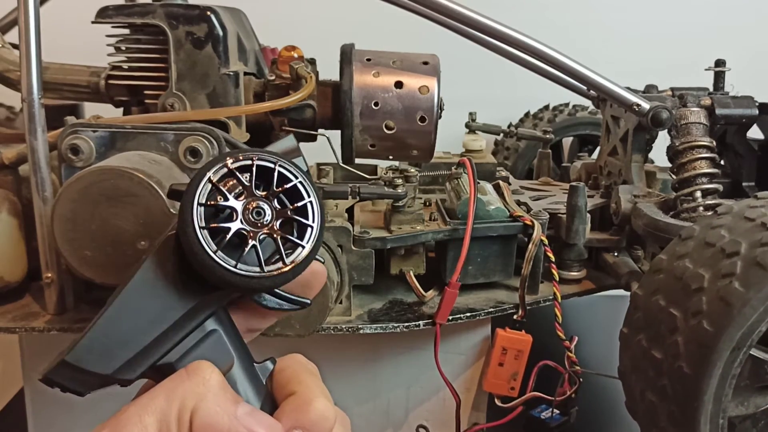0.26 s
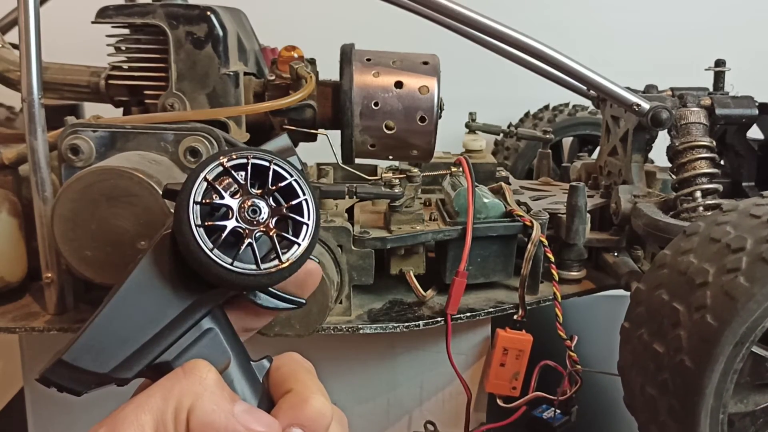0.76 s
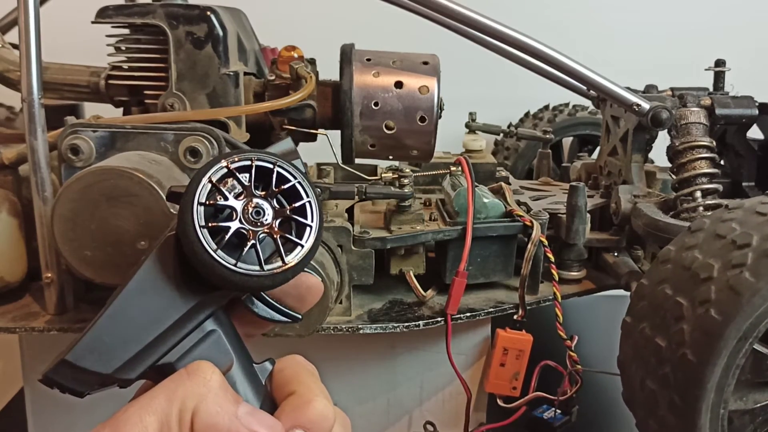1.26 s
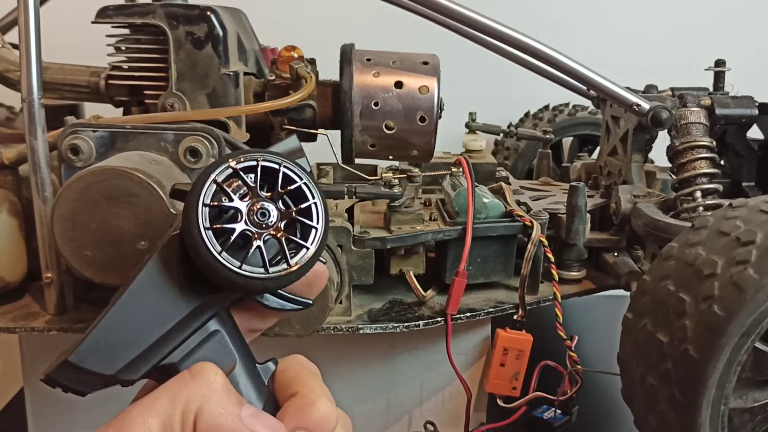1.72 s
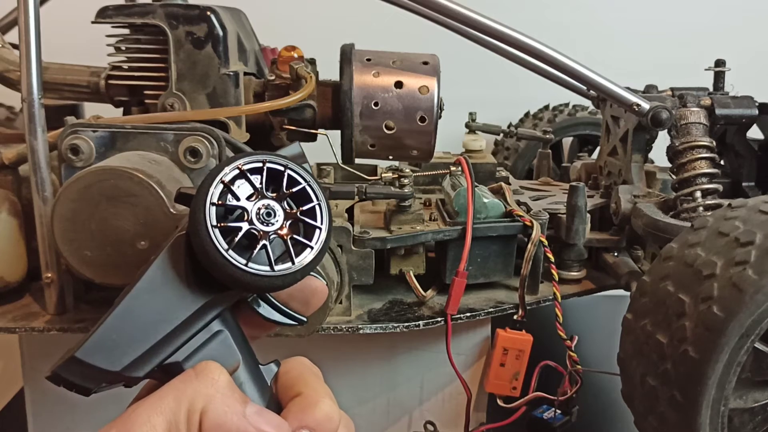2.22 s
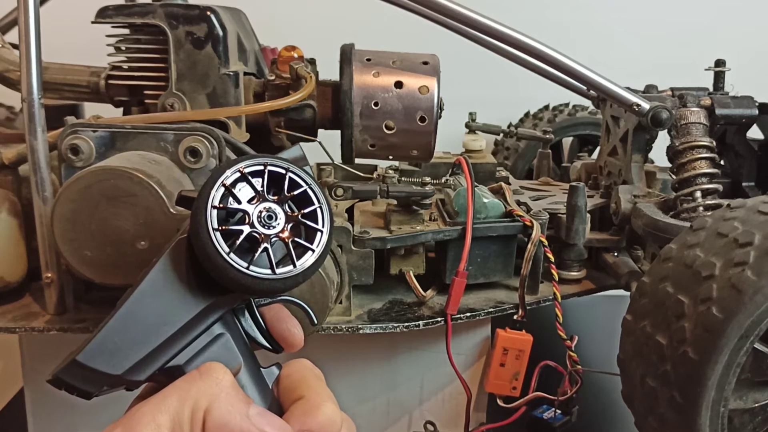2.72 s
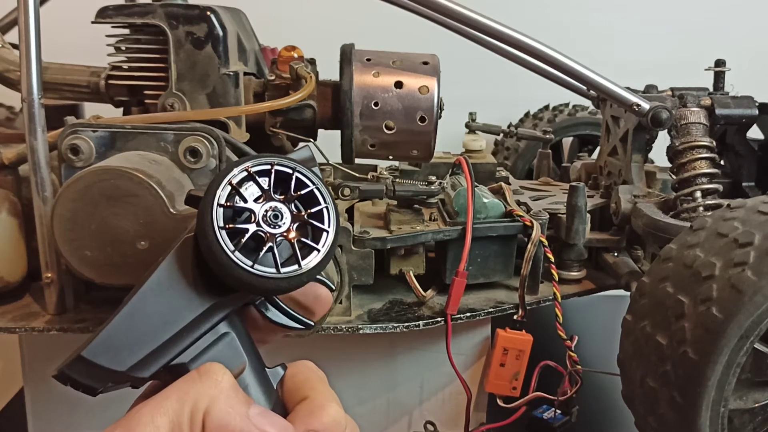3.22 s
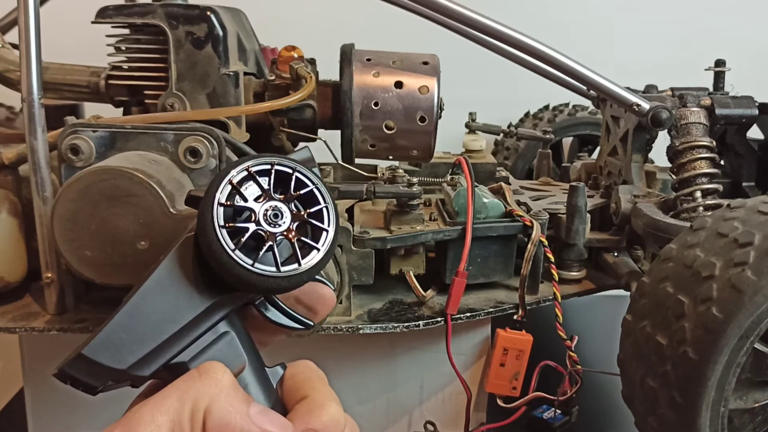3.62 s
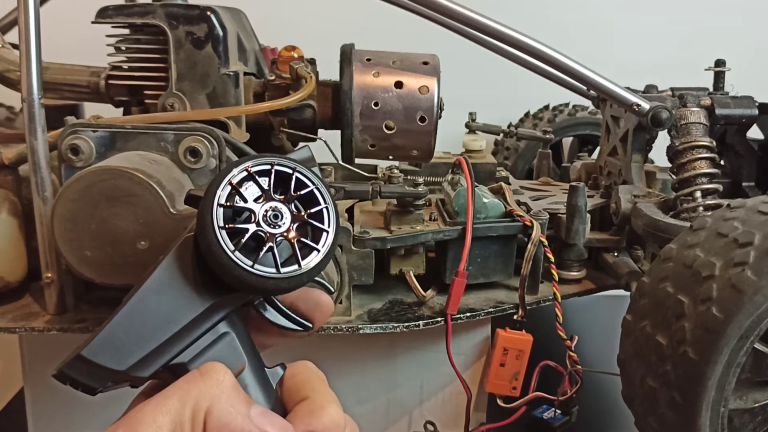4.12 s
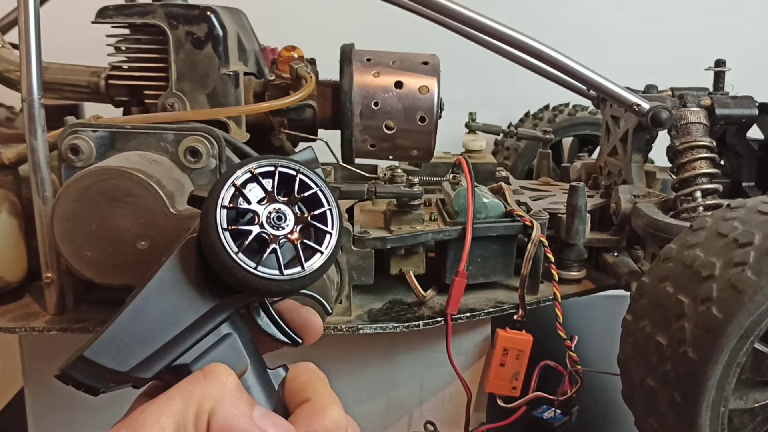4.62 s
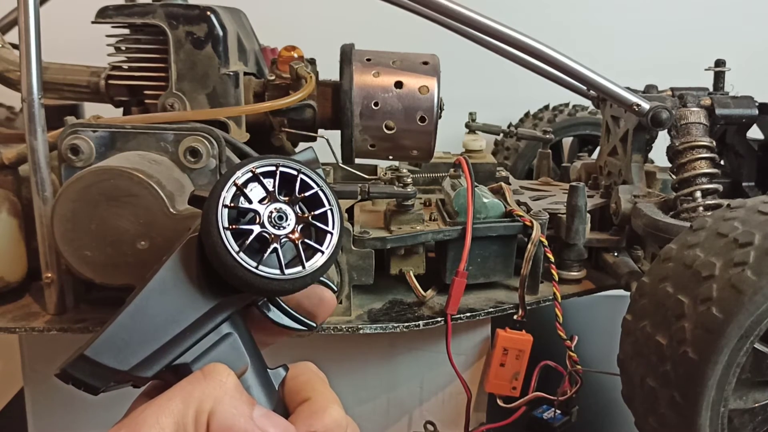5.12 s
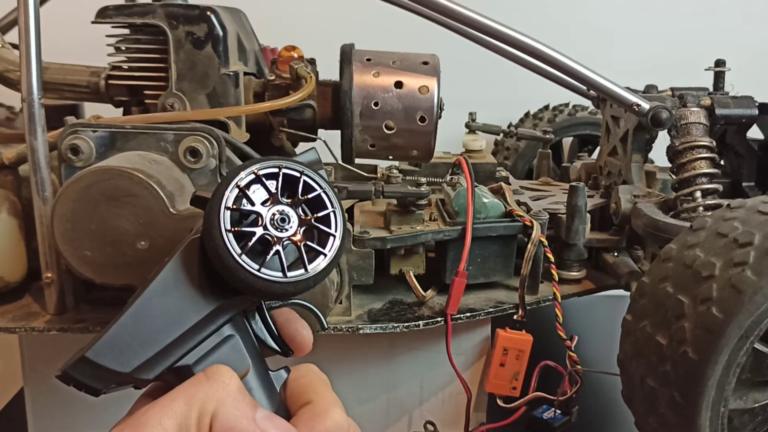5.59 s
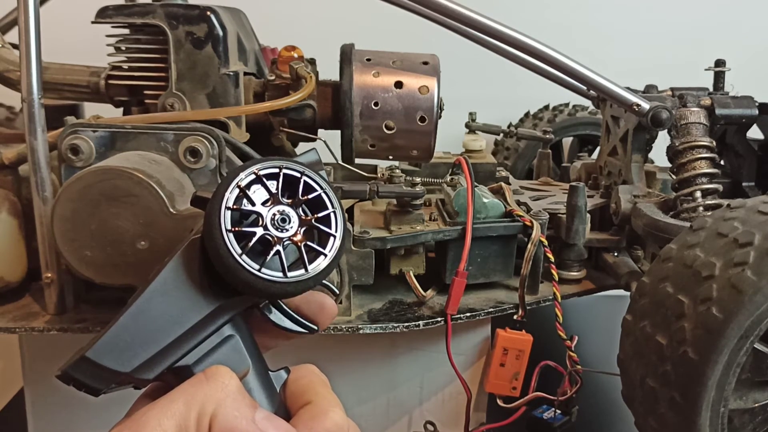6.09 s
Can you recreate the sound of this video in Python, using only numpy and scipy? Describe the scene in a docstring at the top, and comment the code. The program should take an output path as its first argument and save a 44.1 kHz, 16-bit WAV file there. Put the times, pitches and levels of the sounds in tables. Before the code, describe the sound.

A model car's small steering servo works on a bench in a small room, miked close in stereo. Faint short whirs come first, then longer high whines near two kilohertz, grainy with gear rattle and little chirps. The bursts turn quick and choppy, weaken briefly, then lengthen again and end in small whirs. Hard plastic ticks, linkage knocks and soft chassis bumps are scattered over a very quiet low rumble.

```python
"""A steering servo swings a model car's front wheels on a workbench in a small room, over a quiet rumble.
It starts with brief whirs; from about 1 s longer whines near 2 kHz follow, rattling and chirping as the load lets go.
From about 4 s to 5 s the whirs come short and quick, then weaken; longer whines return and small whirs end it.
Plastic ticks, linkage knocks and soft chassis bumps are scattered throughout.
Pinion tones and tooth clicks make the servo, filtered noise the rumble and ticks, ringing modes the blows."""
import sys
import numpy as np
from scipy import signal
from scipy.fft import rfft, irfft
from scipy.io import wavfile
from scipy.ndimage import uniform_filter1d, map_coordinates

SR = 44100
rng = np.random.default_rng(int(sys.argv[2]) if len(sys.argv) > 2 else 0)


def transcribe(signal):
    """Save signal, clipped to [-1, 1], as a 16-bit WAV file at the path in sys.argv[1]."""
    frames = np.atleast_2d(signal).T
    limited = np.clip(frames, -1, 1)
    pcm = np.round(limited * 32767).astype(np.int16)
    wavfile.write(sys.argv[1], SR, pcm)


N = 280035
T = np.arange(N) / SR


def undb(db):
    """Decibels to gain."""
    return 10 ** (np.asarray(db) / 20)


def unit(x):
    """Scale to rms 1."""
    return x / np.sqrt(np.mean(x ** 2) + 1e-20)


def walk(rate_hz):
    """Smooth random drift with rms 1, about `rate_hz` new values a second."""
    width = max(int(SR / rate_hz), 2)
    smoothed = uniform_filter1d(rng.standard_normal(N), width)
    return unit(uniform_filter1d(smoothed, width))


def colour(x, points):
    """Causal minimum-phase filter through (freq_hz, gain_db) points."""
    freq_hz, gain_db = np.transpose(sorted(points))
    size = 8192
    grid_hz = np.arange(size // 2 + 1) * SR / size + 1
    log_gain = np.log(undb(np.interp(np.log(grid_hz), np.log(freq_hz), gain_db)))
    # folding the cepstrum onto positive time puts the energy as early as possible
    cepstrum = irfft(log_gain)[:size // 2]
    cepstrum[1:] *= 2
    response = irfft(np.exp(rfft(cepstrum, size)))
    return signal.fftconvolve(x, response)[:len(x)]


def add(track, start_s, sound):
    """Mix a sound into the track at its start time."""
    i = max(int(start_s * SR), 0)
    track[i:i + len(sound)] += sound[:N - i]


# spectrum of the room rumble and hiss, before its overall level: freq_hz, density_db (dB per Hz, relative)
RUMBLE_SPECTRUM = [(20, -25), (42, -42), (70, -8.5), (105, -3), (170, -5.5), (270, -4), (500, -13.5),
                   (800, -16), (1200, -20), (2200, -22), (3000, -24.5), (4400, -24.5), (5200, -35),
                   (6400, -29.5), (8000, -34), (16000, -30)]


def room_rumble(level_db=-62.5, side_db=-2):
    """Steady noise, mostly low with faint hiss, partly alike on both sides."""
    mid = unit(colour(rng.standard_normal(N), RUMBLE_SPECTRUM))
    side = unit(colour(rng.standard_normal(N), RUMBLE_SPECTRUM))
    return undb(level_db) * (mid + undb(side_db) * side * np.array([[1], [-1]]))


def blows(events, modes, contact_s, gain_db):
    """Short, rough contacts ring the modes of a part, each mode slightly detuned per blow."""
    out, t = np.zeros(N), T[:SR // 4]
    # the contact pushes mostly within the range of the modes
    band_hz = [modes[0][0] * .95, modes[-1][0] * 1.3]
    band = signal.butter(3, band_hz, "bandpass", fs=SR, output="sos")
    for start_s, level_db in events:
        ring = np.zeros(len(t))
        for freq_hz, mode_db, t60_s in modes:
            detune = 1 + 0.02 * rng.standard_normal()
            ring += undb(mode_db - 60 * t / t60_s) * np.sin(2 * np.pi * freq_hz * detune * t)
        push = signal.sosfilt(band, rng.standard_normal(len(t)) * np.exp(-t / contact_s))
        hit = signal.fftconvolve(ring, push)[:len(t)]
        add(out, start_s, hit / np.abs(hit).max() * undb(level_db + gain_db))
    return out


# the tyres shift and bump the chassis: start_s, level_db (peak before the common gain)
BUMPS = [(0.464, -54.5), (0.485, -46.5), (0.596, -63.5), (2.643, -55.5), (2.664, -66), (4.169, -59),
         (4.577, -67), (5.585, -59), (5.61, -58)]
# modes of the chassis: freq_hz (before detuning), level_db (relative), t60_s
CHASSIS_MODES = [(288, -6, 0.11), (316.6, -7, 0.18), (355, -3, 0.077), (390, -5, 0.066), (526, -10, 0.065),
                 (680, -10.5, 0.044)]


def chassis_bumps():
    """Soft contacts ring the low modes of the chassis."""
    return blows(BUMPS, CHASSIS_MODES, contact_s=0.0031, gain_db=9.5)


# play in the steering linkage is taken up: start_s, level_db (peak before the common gain)
KNOCKS = [(0.114, -58.5), (0.477, -58.5), (0.596, -74.5), (0.821, -62), (1.792, -63), (2.417, -55),
          (2.65, -58), (4.17, -71.5), (3.228, -60), (4.577, -69), (5.003, -59.5), (5.843, -65)]
# modes of the linkage: freq_hz (before detuning), level_db (relative), t60_s
LINKAGE_MODES = [(386, -10, 0.021), (477, -4.5, 0.056), (583, -9, 0.016), (760, -8, 0.027), (847, 5, 0.024),
                 (998, -3, 0.02), (1269, 5, 0.045), (1434, -3.5, 0.061)]


def linkage_knocks():
    """Loose joints knock and ring the short modes of the linkage."""
    return blows(KNOCKS, LINKAGE_MODES, contact_s=0.0027, gain_db=17.0)


# sharp plastic ticks: start_s, level_db (peak before the common gain), top_db (added to the top colour point)
TICKS = [(0.113, -38.5, -25), (0.25, -28, -17.5), (0.603, -37, -37), (1.483, -40.5, -81),
         (2.3008, -36.5, -14.5), (2.3156, -21.5, -12), (2.3353, -23.5, -35.5), (2.4151, -22, -47),
         (3.3873, -16, -6.5), (3.791, -28.5, -41), (4.259, -27, -19.5), (4.7333, -27.5, -29.5),
         (4.887, -56.5, -30), (5.257, -29.5, -14), (5.267, -30.5, -42), (5.3365, -28.5, -38),
         (5.897, -16.5, -12.5), (6.222, -37, -20)]
# shared colour of the ticks: freq_hz, gain_db
TICK_COLOUR = [(500, -38), (1200, -20.5), (2000, 1.5), (3000, 7.5), (5000, -8.5), (6400, 13.5), (8000, 2.5),
               (15000, 2)]


def plastic_ticks(t60_s=0.016, gain_db=-4.5):
    """Hard plastic edges snap past each other: decaying noise, each tick with its own brightness."""
    out, t = np.zeros(N), T[:4096]
    for start_s, level_db, top_db in TICKS:
        crack = rng.standard_normal(len(t)) * undb(-60 * t / t60_s)
        points = [(hz, db + top_db * (hz > SR / 4)) for hz, db in TICK_COLOUR]
        crack = colour(crack, points)
        add(out, start_s, crack / np.abs(crack).max() * undb(level_db + gain_db))
    return out


START_HZ = 1601.4  # mesh rate at which the motor catches
BRAKE_POWER = 3.0  # holds its speed and brakes late: power of the share of the way gone
RUN_DOWN_HZ_PER_S = 16000  # loss of mesh rate between stretches of drive
ATTACK_S, COAST_S = 0.0032, 0.007  # drive switches on (ramp), coasts out (time constant)
WHINE_SLOPE_DB, RATTLE_SLOPE_DB = 2, 0.62  # fall per 100 Hz below top speed
JOLT_WHINE_DB, JOLT_S = 5, 0.0085  # extra whine of the starting torque and its fade (time constant)

# one stretch of motor drive per row; a longer swing may span several rows:
# start_s, length_s, spin_up_s (time constant), top_hz (target mesh rate),
# end_hz (mesh rate aimed at by the end of the stretch), whine_db and rattle_db (base levels at top speed),
# second_db (second overtone term, relative to the whine)
DRIVE_STRETCHES = [ (0.0, 0.08, 0.0032, 1733, 1612, -54, -50.5, -15.5),
                   (0.108, 0.12, .002, 1974, 1825, -45, -44, -12),
                   (0.245, 0.014, 0.00098, 2067, 1903, -42, -46, -18),
                   (0.346, 0.017, 0.0029, 1928, 1873, -40.5, -49, -17),
                   (0.372, 0.045, 0.002, 1950, 1884, -41, -48, -18),
                   (0.446, 0.063, 0.009, 1890, 1874, -46.5, -46.5, -11.5),
                   (0.73, 0.0078, 0.0015, 1675, 1684, -46, -52.5, -7.5),
                   (0.737, 0.0087, 0.001, 2317, 2233, -35, -44, -25.5),
                   (0.748, 0.007, 0.0008, 1683, 1648, -49, -49, -14.5),
                   (0.811, 0.019, 0.0027, 1670, 1631, -51.5, -51, -19.5),
                   (0.984, 0.0098, 0.00089, 2350, 2278, -36, -44, -17.5),
                   (0.993, 0.23, 0.0031, 2149, 2059, -34.5, -50.5, -29),
                   (1.223, 0.011, 0.00092, 1850, 1754, -46, -52, -20),
                   (1.501, 0.02, 0.0039, 1763, 1763, -52, -57, -11.5),
                   (1.523, 0.2, 0.0083, 1900, 1798, -43.5, -50, -12),
                   (1.717, 0.039, .004, 1771, 1654, -53.5, -49, -15),
                   (1.905, 0.014, 0.0012, 1668, 1670, -52, -60, -23),
                   (1.921, 0.158, 0.0011, 2161, 2100, -34.5, -49, -28),
                   (2.081, 0.045, 0.0037, 1979, 1697, -40, -50, -22),
                   (2.328, 0.053, .02, 2143, 2117, -42, -50, -15.5),
                   (2.388, 0.15, 0.0041, 2162, 2130, -33.5, -49.5, -23),
                   (2.531, 0.043, 0.0035, 2104, 2004, -40, -50, -18.5),
                   (2.567, 0.35, .004, 1995, 1919, -41, -51, -14),
                   (3.203, 0.031, 0.0032, 1936, 1947, -43.5, -48, -24),
                   (3.229, 0.3, 0.015, 2037, 1984, -38.5, -47.5, -21.5),
                   (3.507, 0.19, 0.0037, 1938, 1896, -39.5, -47.5, -16),
                   (3.714, 0.069, 0.0051, 1790, 1623, -49.5, -53.5, -20.5),
                   (3.802, 0.11, .0015, 2171, 2071, -33.5, -48.5, -37),
                   (3.939, 0.01, 0.00094, 1707, 1643, -48.5, -53, -20.5),
                   (3.964, 0.059, 0.0076, 1940, 1823, -40.5, -46.5, -16.5),
                   (4.043, 0.09, 0.0044, 2080, 1970, -37.5, -48, -21),
                   (4.157, 0.075, 0.0094, 1987, 1881, -39.5, -43.5, -31),
                   (4.25, 0.0077, .002, 1684, 1666, -49, -52, -24.5),
                   (4.286, .018, 0.0065, 1845, 1724, -46.5, -51, -20.5),
                   (4.323, 0.08, 0.0063, 2001, 1875, -41, -44.5, -23),
                   (4.416, 0.0078, 0.0026, 1814, 1706, -45.5, -52, -16.5),
                   (4.443, 0.085, .006, 2056, 1979, -38, -48, -22),
                   (4.522, 0.0088, 0.00097, 1732, 1659, -48, -51, -18.5),
                   (4.542, 0.055, 0.005, 1989, 1887, -39, -47, -17.5),
                   (4.612, 0.0088, 0.0018, 1677, 1660, -45.5, -53, -21.5),
                   (4.63, 0.087, 0.0081, 2107, 1974, -37.5, -49, -26.5),
                   (4.746, 0.097, 0.0084, 1964, 1890, -41, -43.5, -30),
                   (4.862, 0.04, 0.0027, 1796, 1641, -47.5, -51, -18),
                   (4.918, 0.04, 0.0034, 2196, 2090, -34, -45.5, -24),
                   (4.973, 0.084, 0.0039, 1977, 1876, -42, -44, -28.5),
                   (5.077, 0.075, 0.0043, 1804, 1582, -49, -53, -19.5),
                   (5.178, 0.024, 0.0031, 1494, 1450, -58, -59, -20),
                   (5.239, 0.013, .003, 1446, 1460, -59.5, -56, -3),
                   (5.341, 0.014, .006, 1754, 1753, -48, -53, -20.5),
                   (5.355, 0.197, 0.0081, 2166, 2060, -34.5, -48, -20),
                   (5.565, .245, 0.0038, 1978, 1892, -41.5, -51, -13.5),
                   (5.828, 0.019, 0.0038, 1836, 1791, -48.5, -54.5, -21),
                   (5.845, 0.23, 0.0031, 2021, 1919, -39.5, -47.5, -22.5),
                   (6.104, 0.025, 0.0052, 1949, 1845, -41.5, -45.5, -40),
                   (6.144, 0.01, 0.0031, 1755, 1671, -50.5, -53, -18),
                   (6.177, 0.0084, 0.0039, 1732, 1660, -50.5, -53, -6.5),
                   (6.199, 0.039, 0.0032, 1737, 1571, -47.5, -51.5, -22),
                   (6.247, 0.018, 0.0017, 1773, 1698, -43, -63, -23.5), ]


def motor_drive():
    """Each stretch moves the mesh rate to its top, eases it to its end and lets it run down; gains follow."""
    mesh_hz = np.full(N, START_HZ)
    whine, rattle, second = np.zeros(N), np.zeros(N), np.zeros(N)
    for start_s, length_s, spin_up_s, top_hz, end_hz, whine_db, rattle_db, second_db in DRIVE_STRETCHES:
        i = max(int(start_s * SR), 0)
        now = slice(i, i + SR)  # each stretch takes over from the one before
        age_s = T[now] - T[i]
        over_s = np.maximum(age_s - length_s, 0)
        spin_up_hz = (top_hz - mesh_hz[i]) * np.exp(-age_s / spin_up_s)
        brake_hz = (top_hz - end_hz) * np.minimum(age_s / length_s, 1) ** BRAKE_POWER
        below_hz = spin_up_hz + brake_hz
        below = below_hz / 100
        on = np.minimum(age_s / ATTACK_S, 1)
        running = on * np.exp(-over_s / COAST_S)
        jolt_db = JOLT_WHINE_DB * np.exp(-age_s / JOLT_S)
        new_whine = running * undb(whine_db - WHINE_SLOPE_DB * below + jolt_db)
        new_rattle = running * undb(rattle_db - RATTLE_SLOPE_DB * below)
        mesh_hz[now] = np.maximum(top_hz - below_hz - RUN_DOWN_HZ_PER_S * over_s, min(START_HZ, end_hz))
        whine[now] = (1 - on) * whine[now] + new_whine
        rattle[now] = (1 - on) * rattle[now] + new_rattle
        second[now] = undb(second_db)
    return mesh_hz, whine, rattle, second


# the load lets go: centre_s, race_hz (mesh rate reached), whine_db (base level)
SLIPS = [(0.131, 2002, -36), (0.251, 2030, -37), (1.098, 2170, -31), (1.618, 2256, -38.5),
         (1.66, 2310, -35), (1.725, 2280, -37.5), (1.75, 2150, -41.5), (2.586, 2171, -38.5),
         (2.605, 2271, -30), (2.678, 2267, -33.5), (2.698, 2155, -34), (2.718, 2233, -31),
         (2.758, 2147, -34), (2.812, 2143, -36), (2.855, 2156, -34), (2.896, 2143, -34.5),
         (3.333, 2282, -33.5), (3.366, 2264, -30), (3.395, 2189, -32.5), (3.515, 2353, -29.5),
         (3.827, 2184, -25), (3.912, 2172, -31), (4.068, 2155, -32.5), (4.672, 2243, -34.5),
         (4.712, 2152, -34), (4.97, 2122, -38), (5.378, 2263, -28), (5.583, 2171, -33), (5.644, 2254, -34),
         (5.666, 2286, -31.5), (5.688, 2219, -34), (5.735, 2239, -36.5), (5.755, 2190, -37),
         (5.992, 2089, -33), (6.119, 1950, -37.5), (6.251, 1880, -48)]


def slips(mesh_hz, whine, rattle, second, half_s=.0035, second_db=-20.5, clash_db=-12):
    """The unloaded motor chirps as it races through the gear slack; teeth clash as the slack closes."""
    for centre_s, race_hz, whine_db in SLIPS:
        now = slice(int(centre_s * SR) - SR // 20, int(centre_s * SR) + SR // 20)
        free = np.exp(-((T[now] - centre_s) / half_s) ** 2)
        mesh_hz[now] += (race_hz - mesh_hz[now]) * np.minimum(2 * free, 1)
        whine[now] += (undb(whine_db) - whine[now]) * free
        rattle[now] += undb(whine_db + clash_db) * free
        second[now] += (undb(second_db) - second[now]) * free
    return mesh_hz, whine, rattle, second


SMOOTH_HZ = 2050  # mesh rate above which the drive no longer pulses
SURGE, PULSING = .58, 4.0  # swing of speed and of force per unit of slack
WANDER, JITTER = .013, .006  # slow and fast unevenness, shares of speed (wander grows with slack)
JOSTLE = .16  # speed share when rattle is all there is


def motor_turning(mesh_hz, whine, rattle, pulse_hz=42):
    """Uneven running of the motor: teeth passed so far, and the force of the pulsing drive."""
    slack = np.clip(1 - mesh_hz / SMOOTH_HZ, 0, .2)
    # at low speed each command pulse kicks the motor: it is loudest while it speeds up
    pulse = 2 * np.pi * np.cumsum(pulse_hz * (1 + .2 * walk(25))) / SR
    surge = SURGE * slack * signal.sawtooth(pulse, .7)
    drive = 1 + PULSING * slack * np.sin(pulse - np.pi / 5)
    # rattling teeth jostle the pinion and break up its tone
    rattle_share = rattle / (rattle + whine + 1e-12)
    jostle = JOSTLE * rattle_share ** 2 * walk(260)
    wander = WANDER * (1 + 3 * slack) * walk(170)
    speed_hz = mesh_hz * (1 + surge + wander + jostle + JITTER * walk(900))
    return np.cumsum(speed_hz) / SR, drive


# what the gear case radiates when teeth rattle: freq_hz (before drift), gain_db
CASE_COLOUR = [(150, -19.5), (750, -14), (1050, -22), (1400, -7.5), (1660, -2), (1780, -3), (1950, 6.5),
               (2180, 14), (2400, -5), (2580, -2.5), (2850, 6), (3150, 2.5), (3470, -7), (3760, 1),
               (4300, -4), (4680, 6.5), (4950, -13.5), (5400, -5.5), (5850, -5.5), (6150, 9), (6700, 0.5),
               (7000, -5.5), (7500, 5.5), (7900, -9), (8350, -3.5), (8700, -15.5), (12500, -15.5),
               (16000, -14.5)]
# treble level in the gear rattle: time_s, gain_db
RATTLE_TREBLE = [(0, -5), (0.5, 1), (1.0, 2), (1.65, -1), (2.5, 0), (3.5, 1.5), (4.3, 1), (5.0, 0.5),
                 (6.3, -0.5)]


def gear_rattle(teeth, pinion, drift=.022, drift_rate_hz=14):
    """Every tooth clicks against the next gear and rings the case, with some noise between."""
    contact = np.diff(np.floor(teeth), prepend=0) * undb(5 * rng.standard_normal(N))
    clicks = unit(contact * rng.choice([-1, 1], N))
    uneven = (clicks + 0.24 * rng.standard_normal(N)) * undb(0.7 * walk(110))
    # case resonances shift with the changing load: playback time stretches and shrinks
    shifted = np.cumsum(1 + drift * walk(drift_rate_hz))
    case = map_coordinates(colour(uneven, CASE_COLOUR), [shifted], order=5, mode="mirror")
    gears = case * (1 + .3 * pinion)
    highpass = signal.butter(3, 5200, "highpass", fs=SR, output="sos")
    treble = signal.sosfiltfilt(highpass, gears)
    treble_gain = undb(np.interp(T, *np.transpose(RATTLE_TREBLE)))
    return unit(gears + (treble_gain - 1) * treble)


def pinion_whine(teeth, pinion, mesh_hz, second, third_db=-19, steepness=6, swell=.16, throb_db=2.6):
    """The pinion sings at its mesh rate with two overtones, swelling as off-centre gears turn."""
    mesh = 2 * np.pi * teeth
    gear = np.sin(mesh / 58)  # one first-gear turn
    tone = np.sin(mesh) * (1 + swell * (pinion + walk(300))) * undb(throb_db * gear)
    # no two teeth are alike, so the overtones flutter; the third grows with speed
    second_tone = second * np.sin(2 * mesh + .5 * walk(500))
    third_gain = undb(third_db) * (mesh_hz / SMOOTH_HZ) ** steepness
    third_tone = third_gain * np.sin(3 * mesh + 0.61 * walk(550))
    flutter = 1 + .65 * walk(290) + .4 * pinion
    return unit(tone + (second_tone + third_tone) * flutter)


def servo(rattle_gain_db=0.46):
    """One motor drives both the pinion whine and the gear rattle."""
    mesh_hz, whine, rattle, second = slips(*motor_drive())
    teeth, drive = motor_turning(mesh_hz, whine, rattle)
    pinion = np.sin(2 * np.pi * teeth / 10)  # one pinion turn, slightly off centre
    tone = whine * pinion_whine(teeth, pinion, mesh_hz, second)
    gears = undb(rattle_gain_db) * rattle * gear_rattle(teeth, pinion)
    return drive * (tone + gears)


# modes of the metal frame: freq_hz, gain_db (at resonance), t60_s
FRAME_MODES = [(1645, 5, 0.19), (1944, 1, 0.27), (1992, -1.5, 0.2), (2073, -3.5, 0.19), (2180, -1, 0.13),
               (2237, -3.5, 0.2)]


def metal_frame(x):
    """The frame takes up the servo sound near its modes and gives it back slowly."""
    t = T[:SR // 2]
    response = np.zeros(len(t))
    for freq_hz, gain_db, t60_s in FRAME_MODES:
        decay = np.exp(-np.log(1000) * t / t60_s)
        response += undb(gain_db) * 2 * decay / decay.sum() * np.sin(2 * np.pi * freq_hz * t)
    return x + signal.fftconvolve(x, response)[:N]


def room(x, near_db=1, near_s=0.002, tail_db=-2, t60_s=0.36, side_db=-2.0):
    """Direct sound, quick reflections off chassis and bench, then the walls, without broad colour."""
    t, heard = T[:SR // 2], []
    freq_hz = np.arange(len(t) // 2 + 1) * SR / len(t) + 1
    for direct in (1, 0):  # mid, then side: the direct sound is in the middle only
        near = rng.standard_normal(len(t)) * np.exp(-t / near_s) * (t > .0005)
        tail = rng.standard_normal(len(t)) * undb(-60 * t / t60_s) * (t > .007)
        response = undb(near_db) * near / np.linalg.norm(near)
        response += undb(tail_db) * tail / np.linalg.norm(tail)
        response[0] += direct
        # flatten the broad colour, keep the fine structure
        broad_db = 10 * np.log10(uniform_filter1d(np.abs(rfft(response)) ** 2, size=70))
        flat = colour(response, zip(freq_hz, -broad_db))
        heard.append(unit(signal.fftconvolve(x, flat)[:N]))
    mid, side = heard[0], undb(side_db) * heard[1]
    # both sides get the same power; the sound reaches the left one a sample earlier
    left, right = unit(mid + side), np.roll(unit(mid - side), 1)
    return np.std(x) * np.array([left, right])


def scene():
    """Servo, ticks, knocks and bumps sound in the room, over its rumble."""
    sources = metal_frame(servo()) + plastic_ticks() + linkage_knocks() + chassis_bumps()
    return room(sources) + room_rumble()


def record(dry, hole_db=-26, lean_db=2, top_hz=15900):
    """The two sides differ in colour; almost nothing is heard from about 9.6 to 11.5 kHz; the top is cut."""
    hole = [(8600, 0.0095), (9600, hole_db), (11450, hole_db), (11650, 0.0002)]
    sides = []
    for x, sign in zip(dry, (1, -1)):  # left and right lean opposite ways
        lean = [(2200, 0.016), (4300, -sign * 1.0), (6200, sign * lean_db), (7600, sign * 0.9),
                (8600, -sign * 3.6), (13000, -sign * 2.0)]
        sides.append(colour(colour(x, hole), lean))
    lowpass = signal.ellip(10, .2, 70, top_hz, fs=SR, output="sos")
    return signal.sosfilt(lowpass, sides)


dry = scene()
out = record(dry)
transcribe(out)
```